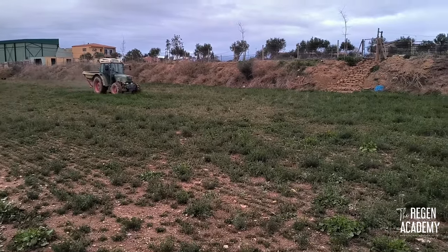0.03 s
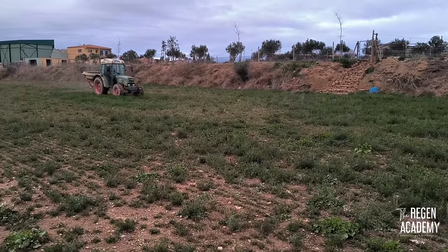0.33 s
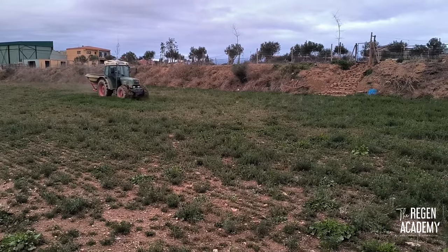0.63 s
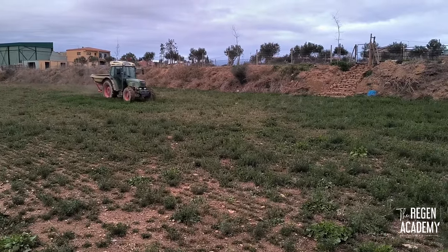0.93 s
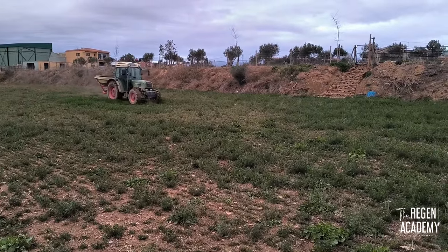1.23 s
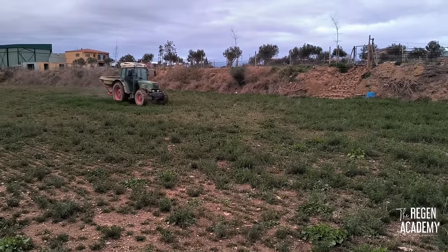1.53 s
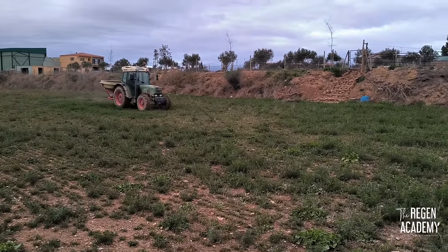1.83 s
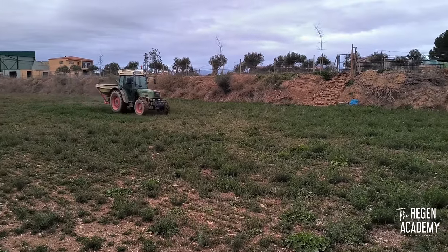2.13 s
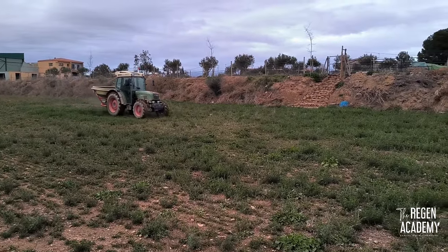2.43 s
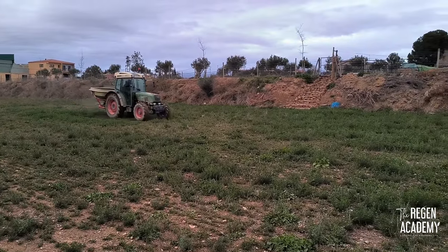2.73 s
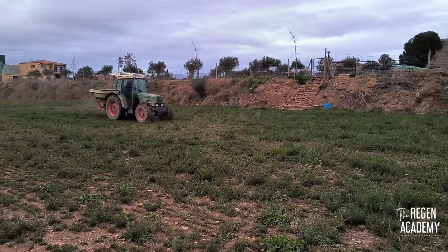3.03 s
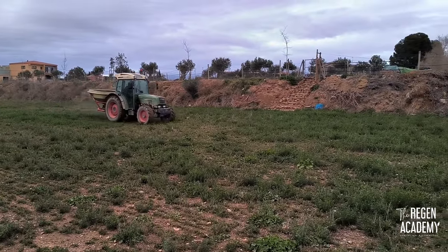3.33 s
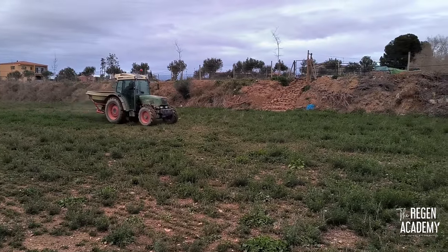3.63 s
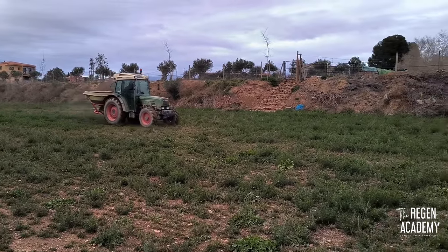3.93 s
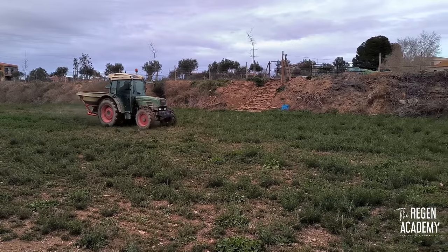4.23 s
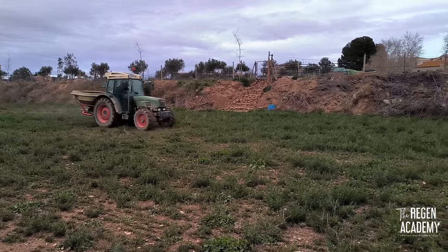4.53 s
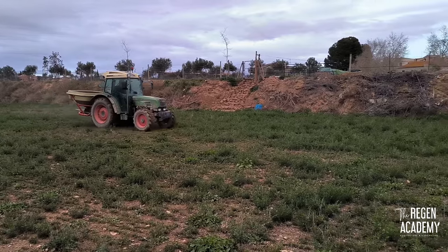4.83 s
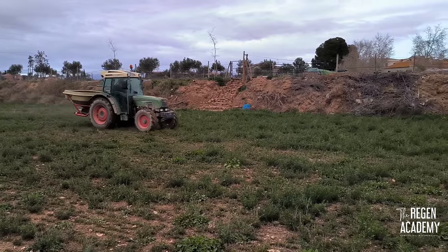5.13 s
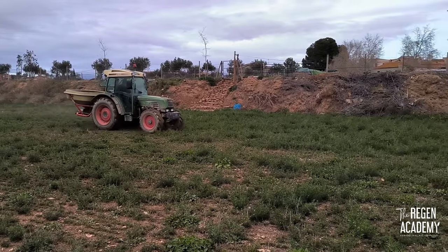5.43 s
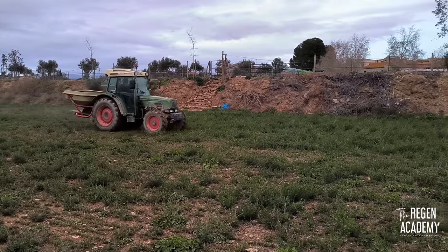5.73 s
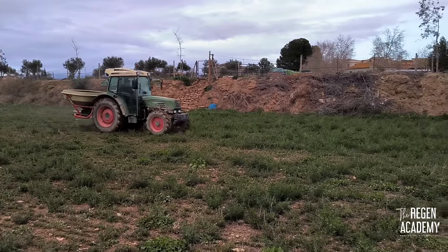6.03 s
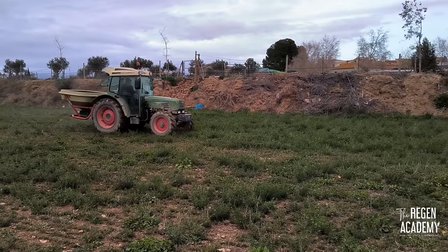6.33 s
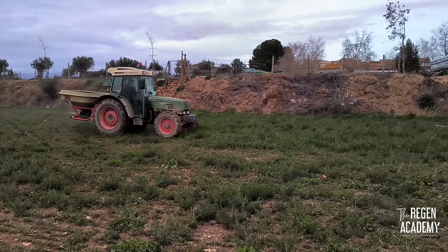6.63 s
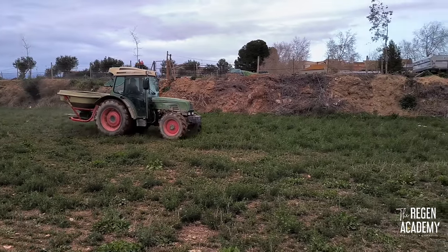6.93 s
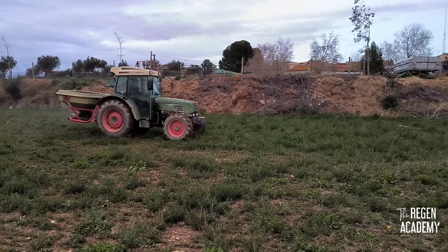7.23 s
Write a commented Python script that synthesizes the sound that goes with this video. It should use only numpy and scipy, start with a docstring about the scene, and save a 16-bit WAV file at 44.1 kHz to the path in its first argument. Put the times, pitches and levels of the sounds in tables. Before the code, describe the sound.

A diesel tractor drives across an open field at steady revs, its exhaust droning and throbbing under a fast metallic engine knock and an airy hiss of fan and tyres. It gradually grows louder as it approaches. The spreader's hopper gives a soft hollow bump midway and a stronger one near the end, as a gear whine comes forward. The microphone hears it from slightly left.

```python
"""A four-cylinder diesel tractor draws a spreader across a field at governed revs, nearing and turning
side-on. Periodic firing makes its exhaust drone, chuff and throb; each combustion excites the modes of
the block, and meshing gears whine. Fan and tyres hiss, and the hopper booms over two bumps.
Spherical spreading raises the level on the approach. A microphone with two closely spaced ports
hears the tractor from slightly left."""
import sys
import numpy as np
from scipy import signal
from scipy.fft import rfft, irfft, next_fast_len
from scipy.io import wavfile
from scipy.ndimage import uniform_filter1d, map_coordinates

SR = 44100
rng = np.random.default_rng(int(sys.argv[2]) if len(sys.argv) > 2 else 0)


def log_audio(samples):
    """Write samples as a 16-bit WAV file to the path given in sys.argv[1]."""
    # one column per channel
    frames = np.atleast_2d(samples).T
    # limit to full scale, then quantise
    limited = np.clip(frames, -1, 1)
    pcm = np.round(limited * 32767).astype(np.int16)
    wavfile.write(sys.argv[1], SR, pcm)


N = 325458

# governed engine speed: t/s, firing rate/Hz
FIRING_RATE = [(0.0, 54.06), (1.5, 54.45), (2.7, 54.25), (3.4, 54.47), (4.4, 53.9), (5.2, 54.36),
               (6.0, 54.2), (6.7, 54.42), (7.38, 54.24)]
# peaks of the governor's hunting: t/s
HUNT_PEAKS = [-.42, .14, .72, 1.22, 1.7, 2.15, 2.62, 3.22, 3.75, 4.28, 4.85, 5.35, 5.93, 6.56, 7.1, 7.65]
# cylinders in firing order: lateness/firing intervals, level/dB, decay/firing intervals
CYLINDERS = [(0.03, 0.5, 0.46), (0.04, 0.3, 0.42), (0.02, 0.5, 0.48), (0.08, 0.4, 0.42)]
# the tractor's turn: t/s, flank share (0 head-on, 1 side-on)
FLANK_SHARE = [(0, 0.1), (2.5, 0.2), (4, 0.38), (5, 0.6), (6, 1), (7.38, 1)]
# firing harmonics: order, base level/dB, growth/dB per dB of approach, dip at t/s, dip depth/dB
DRONE_HARMONICS = [(2, -55.4, 0.8, 7.3, 6), (3, -79, 6.15, 4.8, 6.5), (4, -55.5, 0.3, 6, 6),
                   (5, -61.5, 1.6, 4.9, 6)]
# tones of unequal cylinders: multiple of the four-stroke cycle rate, head-on level/dB, side-on level/dB
SIDEBANDS = [(4, -76, -74), (6, -78, -76), (7, -82, -71), (9, -70.5, -63), (10, -67, -64), (11, -60.5, -58),
             (13, -73, -70), (14, -75, -66), (15, -71, -55.5), (17, -74, -69), (18, -65, -65),
             (19, -68, -64), (21, -69, -70), (26, -72, -66), (28, -73, -80), (34, -78, -69), (36, -72, -76),
             (38, -73, -75), (40, -71, -72), (42, -74, -75), (44, -74, -78), (84, -71, -72)]
# spectra of puffs, block, crack and rushing air: f/Hz, relative level/dB head-on, the same side-on
PUFF_SPECTRUM = [(25, -37, -45), (42, -37, -32), (65, -22, -32), (87.6, -7, -11.5), (140, -8.5, -9.5),
                 (144, -1, -3.5), (210, -0.5, -5), (259, 0, -3), (348, -4.5, -6.5), (383, -21, -20),
                 (523, -61, -39)]
KNOCK_SPECTRUM = [(307, -59, -52), (360, -7.5, -13), (512, -5, -6.5), (600, -6, -4.5), (820, -10, -2.5),
                  (946, -12.5, -6), (1110, -8.5, -1.5), (1205, -0.5, 1), (1763, -1, -1), (1930, -7.5, -6.5),
                  (2180, -2.5, -4), (2486, -5.5, -2.5), (2460, -25, -7), (3370, -66, -49)]
CRACK_SPECTRUM = [(600, -30, -30), (1250, 0, 0), (2400, -3, -3), (2700, -11, -11), (6500, -12, -11),
                  (7500, -20, -19), (15000, -36, -34)]
HISS_SPECTRUM = [(2200, -20, -20), (2650, -1.3, -3), (4000, -.4, -3), (5000, 0, 0), (6500, -2, -2.5),
                 (7200, -9, -9), (9000, -15, -14.5), (10000, -15, -15), (11000, -19.5, -19),
                 (13000, -23, -21.5), (15500, -27, -24)]
# engine panel modes: f/Hz, width/Hz, level/dB, loudest at t/s, spread/s
PANEL_MODES = [(684, 25, -65, 6.7, 1), (752, 30, -65, 6.3, 1.3), (1145, 25, -68, 2, 2),
               (1210, 20, -62, 5.8, .7), (1245, 18, -56.5, 6.6, .65), (1318, 35, -63, 3.2, 2),
               (1368, 22, -61.5, 4.4, 1.2), (1540, 40, -65, 5, 1.8), (1612, 18, -60.5, 6.9, .7),
               (1698, 30, -58, 4.3, 1), (1960, 50, -67, 4, 2), (2268, 45, -61, 5.8, 1.6),
               (2425, 60, -65, 4.3, 1.3), (2485, 25, -65, 6.9, .8)]
# gear tones: multiple of the firing rate, level/dB, loudest at t/s, spread/s
GEAR_TONES = [(11.75, -61.8, 2.4, 2.6), (12.25, -67.5, 1.6, 3), (14, -68, 5.5, .8), (15, -54, 6.8, 1.45),
              (23, -57, 6.6, .6)]
# band of hiss lifted by the ground echo: t/s, f/Hz
ECHO_BANDS = [(1.8, 4350), (2.7, 4000), (3.5, 3650), (4.3, 3250)]
# hopper booms: t/s, f/Hz, level/dB before the common gain
HOPPER_BUMPS = [(3.262, 287, -46), (6.79, 205, -38)]
# spectrum of the swish: f/Hz, relative level/dB
SWISH_SPECTRUM = [(4000, -30), (5300, 2), (6200, -4), (7500, 0), (10000, -3), (13000, -8), (15500, -18)]
# likeness of the two ports: f/Hz, coherence (0-1)
PORT_COHERENCE = [(100, 1), (600, .99), (1500, .93), (2500, .85), (2700, .3), (2900, .8), (3120, .3),
                  (3400, .77), (4500, .87), (5000, .5), (5300, .8), (6000, .45), (6650, .8), (7100, .5),
                  (7800, .05), (10000, .5), (10500, .25), (15000, .15)]
# lead of the left port: f/Hz, phase/rad
LEFT_LEAD = [(30, 0), (100, .1), (300, .2), (700, .47), (1300, 1), (2200, 1.6), (2500, 2.2), (2700, 3.3),
             (2880, 6.3), (3050, 6), (3250, 3), (3500, 3), (4100, 4), (4500, 3.7), (4900, 4.6), (5150, 3.4),
             (5750, 3.7), (6200, 7), (6600, 7.1), (7100, 8), (7600, 6.9), (9400, 7.5), (10000, 8.6),
             (13000, 8.3)]
# the lead shrinks as the microphone turns after the tractor: t/s, left delay/samples
PAN_DELAY = [(0, -1.2), (.5, -.1), (1.2, .6), (2.4, -.2), (3.5, .35), (5.2, .35), (6.2, 1), (7.38, 1.2)]
# resonances and notches of the ports: f/Hz, left gain/dB, right gain/dB
PORT_RESPONSE = [(1500, 0, 0), (2050, 1.2, -1.2), (2480, 0, 0), (2700, -3, -5), (2900, -1.5, -.5),
                 (3150, -8.5, 1), (3400, -3.5, 1), (3700, -1.5, 3), (4200, -2.5, -1.5), (4700, 0, 0),
                 (4970, 5, -3.5), (5250, -2, -1), (5600, -5, -2), (5920, -10.5, 7), (6050, -13, 5),
                 (6400, -6, 1), (6680, 1.5, 5.5), (6850, -3.5, 0), (7480, 4, -3.5), (7780, -.5, -21),
                 (8080, 5, -13), (8350, 4, -5), (8600, 2.5, -11), (9000, 1, -6), (9500, 4.5, -5),
                 (10050, 3.5, -2.5), (10450, -1, -5), (10800, 3.5, 0), (11400, 0, -4.5), (12300, 4.5, -.5),
                 (13000, 0, 0)]


def exhaust_tones(crank, flank, closer_db):
    """Periodic flow radiates harmonics; the strongest dip once as the ground echo interferes."""
    drone = lope = 0
    for order, db, growth, when, dip_db in DRONE_HARMONICS:
        gain = amp(db + growth * closer_db - dip_db * beam(when, spread_s=.84))
        drone += gain * tone(round(order) * crank, waver_db=.6, drift_rad=.074)
    cycles = crank / len(CYLINDERS)
    for order, head_db, side_db in SIDEBANDS:
        gain = amp(head_db + flank * (side_db - head_db))
        lope += gain * tone(round(order) * cycles, waver_db=1.5, drift_rad=.3)
    return drone + lope


def exhaust_puffs(crank, flank, closer_db, chug_at):
    """Turbulence leaves the pipe in a puff after each firing; a low resonance booms at close range."""
    lope = np.sin(2 * np.pi * (crank - chug_at) / len(CYLINDERS))  # one swell per cycle
    surge = amp(.5 * lope + .9 * wobble(22))
    gate = pulsing(combustions(crank - .25, rise=.23, scatter_db=.5), depth=.44) * surge
    puffs = gate * cyclic_noise(crank, repeat=.14)
    chuff = amp(-52.5 + closer_db - .1 * flank) * radiated(puffs, PUFF_SPECTRUM, flank)
    boom = unit(filtered(puffs[0], lambda hz: resonance(hz, centre=215, width=170) ** 3))
    return chuff + amp(-50.5) * boom * beam(when=7.3, spread_s=.6)


def silencer_chug(crank, flank, closer_db, chug_at):
    """Impulse response: once a cycle, one cylinder's puff rings the silencer and barks from the pipe."""
    age_s = (crank - chug_at) % len(CYLINDERS) / curve(FIRING_RATE)
    pitch_hz = 305 + 4 * closer_db  # climbs on the approach
    phase = 2 * np.pi * pitch_hz * age_s + .5 * wobble(6)
    ring = swell(age_s, rise=.011, decay=.0105) * np.sin(phase)
    puff = swell(age_s - .001, rise=.003, decay=.006) * cyclic_noise(crank, repeat=.6)[0]
    bark = filtered(puff, lambda hz: resonance(hz, centre=500, width=330) ** 3)
    strength = amp(-6 * flank) * unit(amp(wobble(9.1)))  # uneven, and weaker side-on
    return strength * (amp(-55.5 + closer_db) * unit(ring) + amp(-62.5) * unit(bark))


def block_knock(crank, flank, closer_db):
    """Forced vibration: each combustion rattles the block and drives the modes of its panels."""
    gate = pulsing(combustions(crank + .04, rise=.2, scatter_db=.3), depth=.6)
    rattle = gate * cyclic_noise(crank, repeat=.24)
    out = amp(-48.5 + closer_db) * radiated(rattle, KNOCK_SPECTRUM, flank)
    for centre, width, db, when, spread_s in PANEL_MODES:
        ring = filtered(rattle[0],
                        lambda hz: resonance(hz, centre, width) * resonance(hz, centre, 6 * width))
        out += amp(db) * unit(ring) * beam(when, spread_s)
    return out


def combustion_crack(crank, flank, closer_db, scatter_db=.8):
    """A brief pulse has a broad spectrum: each pressure peak tops the knock with a metallic crack."""
    delay, decay = .25, .18  # firing intervals
    firing, age = np.divmod(crank - delay + 1, 1)
    strength = amp(scatter_db * rng.standard_normal(512))[firing.astype(int)]
    snap = unit(strength * np.exp(-age / decay)) * cyclic_noise(crank, repeat=.5)
    return amp(-59.5 + closer_db) * radiated(snap, CRACK_SPECTRUM, flank)


def fan_and_tyre_hiss(crank, flank, closer_db):
    """Broadband noise pulses with the firing; interference with the ground echo lifts a falling band."""
    gate = pulsing(combustions(crank - .06, rise=.18, scatter_db=.7), depth=.3)
    bands = signal.stft(rng.standard_normal((2, N)), nperseg=256)[2]
    flutter = uniform_filter1d(rng.standard_normal(bands.shape[1:]), size=8, axis=0)  # over frequency
    flutter_db = 1.8 * unit(uniform_filter1d(flutter, size=3, axis=1))  # over time
    rustle = signal.istft(bands * amp(flutter_db), nperseg=256)[1][:, :N]
    air = gate * rng.standard_normal(N)
    echo = 0
    for when, centre in ECHO_BANDS:
        band = unit(filtered(air, lambda hz: resonance(hz, centre, width=650) ** 2))
        echo += band * beam(when, spread_s=.45)
    return amp(-52.23 + closer_db) * (radiated(gate * rustle, HISS_SPECTRUM, flank) + amp(-10) * echo)


def gear_whine(crank):
    """Tooth meshing is locked to the crankshaft, so its tones sway with the engine speed."""
    return sum(amp(db) * beam(when, spread_s) * tone(order * crank, waver_db=.6, drift_rad=.15)
               for order, db, when, spread_s in GEAR_TONES)


def hopper_booms(rise_s=.011, t60_s=.11, gain_db=14):
    """Damped free vibration: each bump sets the spreader's hollow hopper ringing."""
    out = np.zeros(N)
    for when, hz, db in HOPPER_BUMPS:
        age_s = np.maximum(np.arange(N) / SR - when, 0)
        onset = 1 - np.exp(-(age_s / rise_s) ** 2)
        out += amp(db + gain_db - 60 * age_s / t60_s) * onset * np.sin(2 * np.pi * hz * age_s)
    return out


def swish():
    """High-band noise swells once, as of tyres in dry weeds."""
    air = filtered(rng.standard_normal((2, N)), lambda hz: amp(along(SWISH_SPECTRUM, hz)))
    return amp(-64) * unit(air) * beam(when=3.6, spread_s=.5)


def crank_position(start=.73, hunt_hz=.36):
    """Phase, counted in firings, is the integral of a rate that hunts about the governed speed."""
    swings = np.interp(np.arange(N) / SR, HUNT_PEAKS, np.arange(len(HUNT_PEAKS)))
    firing_hz = curve(FIRING_RATE) + hunt_hz * np.cos(2 * np.pi * swings)
    return start + np.cumsum(firing_hz) / SR


def combustions(crank, rise, scatter_db):
    """Superposed pulses, each cylinder with its own timing, strength and decay; rise in firings."""
    envelope = np.zeros(N)
    for k, (late, db, decay) in enumerate(CYLINDERS):
        cycle, age = np.divmod(crank - k - late + len(CYLINDERS), len(CYLINDERS))
        strength = amp(db + scatter_db * rng.standard_normal(256))[cycle.astype(int)]
        envelope += strength * swell(age, rise, decay)
    return unit(envelope)


def cyclic_noise(crank, repeat):
    """Partial periodicity: two noises, a share of the first recurring every four-stroke cycle."""
    period = int(SR * len(CYLINDERS) / FIRING_RATE[0][1])
    place = crank / len(CYLINDERS) % 1 * period
    patterns = rng.standard_normal((2, period))
    first, second = [map_coordinates(row, [place], mode="grid-wrap") for row in patterns]
    turn = np.linspace(0, np.pi, N)  # the pattern drifts as the path changes
    recurring = first * np.cos(turn) + second * np.sin(turn)
    pair = rng.standard_normal((2, N))
    pair[0] = np.sqrt(1 - repeat) * pair[0] + np.sqrt(repeat) * recurring
    return pair


def approach_db(nearest_m=16.18, speed_m_per_s=3.39, nearest_s=7.54):
    """Spherical spreading: pressure goes as 1/distance on a straight pass; 0 dB at the outset."""
    distance = np.hypot(nearest_m, speed_m_per_s * (np.arange(N) / SR - nearest_s))
    return 20 * np.log10(distance[0] / distance)


def radiated(pair, spectrum, flank):
    """Directivity: a common and a scattered signal reach the ports coloured by the tractor's aspect."""
    def view(column):
        def blend(hz):
            angle = np.arccos(np.clip(along(PORT_COHERENCE, hz), 0, 1)) / 2
            return amp(along(spectrum, hz, column)) * [np.cos(angle), np.sin(angle)]
        mid, side = filtered(pair, blend)
        return unit(np.array([mid + side, mid - side]))
    return (1 - flank) * view(1) + flank * view(2)


def beam(when, spread_s):
    """Lorentzian gain, as of a radiation lobe sweeping past the listener."""
    return 1 / (1 + ((np.arange(N) / SR - when) / spread_s) ** 2)


def tone(turns, waver_db, drift_rad):
    """Propagation over the field modulates a sinusoid in level and phase; rms 1."""
    phase = 2 * np.pi * (turns + rng.random()) + drift_rad * wobble(2.87)
    return unit(np.sin(phase) * amp(waver_db * wobble(4.06)))


def resonance(hz, centre, width):
    """Response of one damped mode; centre and width in Hz."""
    return 1j * hz * width / (centre ** 2 - hz ** 2 + 1j * hz * width)


def swell(age, rise, decay):
    """A soft onset and exponential damping."""
    age = np.maximum(age, 0)
    return (1 - np.exp(-(age / rise) ** 2)) * np.exp(-age / decay)


def pulsing(envelope, depth):
    """Powers add: the gain of a pulsed share, depth, on top of a steady share."""
    return np.sqrt(1 - depth + depth * envelope ** 2)


def filtered(x, response):
    """Linear filtering: the spectrum of x times a complex response."""
    size = next_fast_len(N + 8192, real=True)
    return irfft(rfft(x, size) * response(np.fft.rfftfreq(size, 1 / SR)), size)[..., :N]


def wobble(rate):
    """Smooth random modulation, rate knots a second."""
    return map_coordinates(rng.standard_normal(int(N * rate / SR) + 4), [np.arange(N) * rate / SR])


def along(table, hz, column=1):
    """Interpolation of one column on a log-frequency axis."""
    columns = np.transpose(table)
    return np.interp(np.log(hz + 1), np.log(columns[0] + 1), columns[column])


def curve(table):
    """Interpolation in time, one value per sample."""
    return np.interp(np.arange(N) / SR, *np.transpose(table))


def amp(db):
    """Decibels to amplitude ratio."""
    return 10 ** (np.asarray(db) / 20)


def unit(x):
    """Normalisation to rms 1."""
    return x / np.sqrt(np.mean(x ** 2) + 1e-20)


def scene():
    """Superposition: one crankshaft times exhaust and engine; a phase lead places the sum to the left."""
    crank, flank, closer_db = crank_position(), curve(FLANK_SHARE), approach_db()
    chug_at = 2.05  # firing intervals into the cycle
    mix = (exhaust_tones(crank, flank, closer_db)
           + exhaust_puffs(crank, flank, closer_db, chug_at)
           + silencer_chug(crank, flank, closer_db, chug_at)
           + block_knock(crank, flank, closer_db)
           + combustion_crack(crank, flank, closer_db)
           + fan_and_tyre_hiss(crank, flank, closer_db)
           + gear_whine(crank) + hopper_booms() + swish())
    left, right = filtered(mix, lambda hz: np.exp(1j * np.outer([.5, -.5], along(LEFT_LEAD, hz))))
    left = map_coordinates(left, [np.arange(N) - curve(PAN_DELAY)], order=5, mode="nearest")
    return np.array([left, right])


def record(dry):
    """Port resonances colour the treble of each channel, and nothing passes above the band limit."""
    limit_hz = 15800
    return filtered(dry, lambda hz: amp([along(PORT_RESPONSE, hz, c) for c in (1, 2)]) * (hz < limit_hz))


dry = scene()
out = record(dry)
log_audio(out)
```